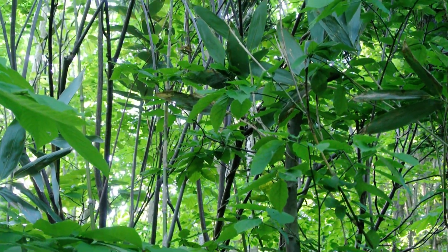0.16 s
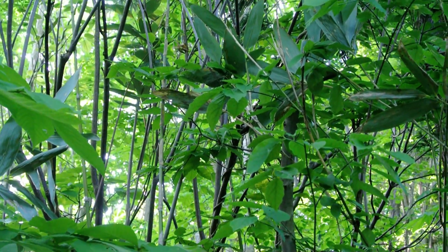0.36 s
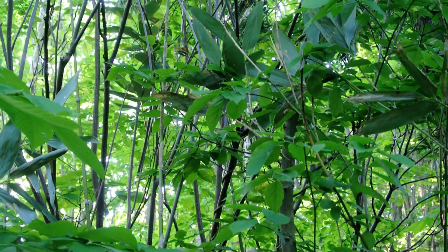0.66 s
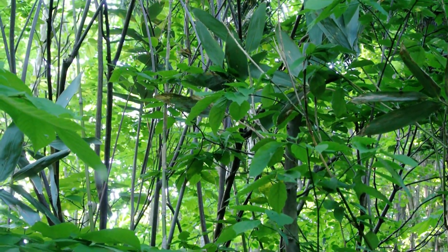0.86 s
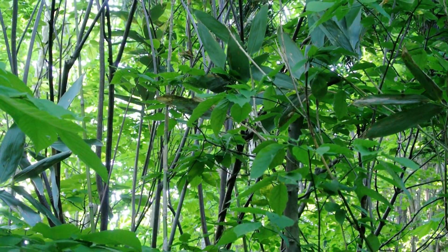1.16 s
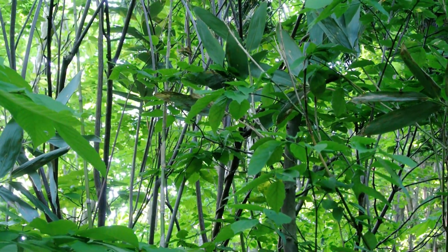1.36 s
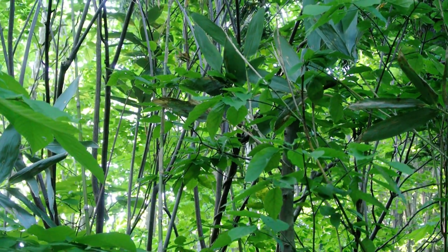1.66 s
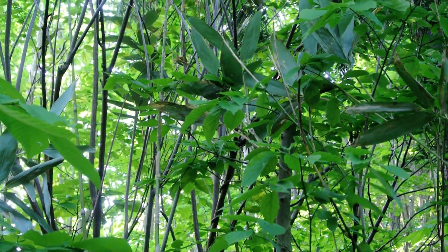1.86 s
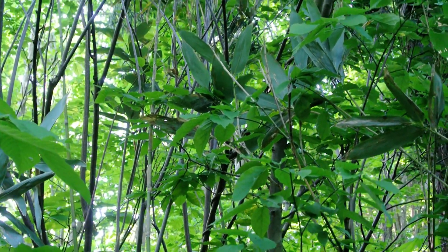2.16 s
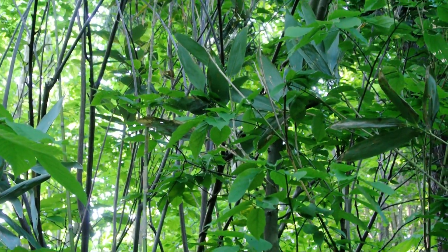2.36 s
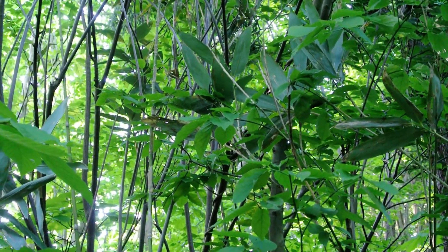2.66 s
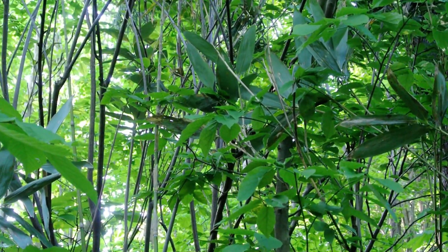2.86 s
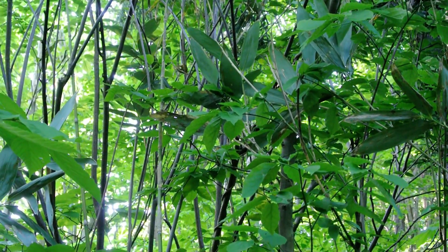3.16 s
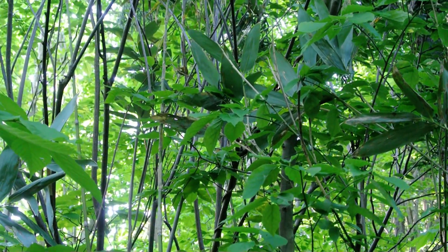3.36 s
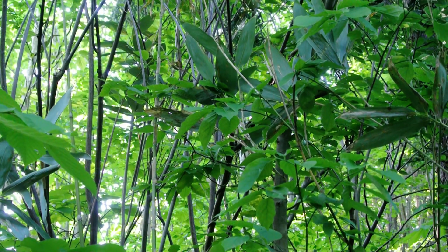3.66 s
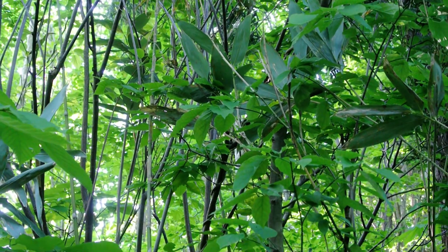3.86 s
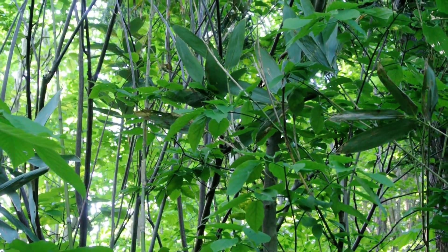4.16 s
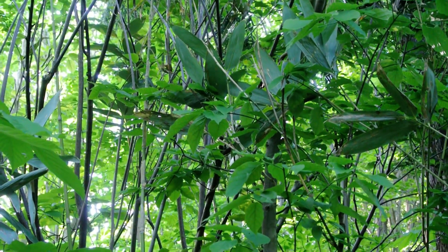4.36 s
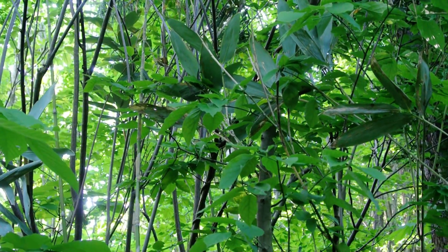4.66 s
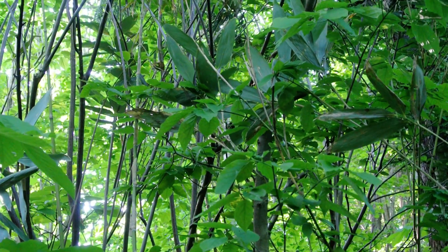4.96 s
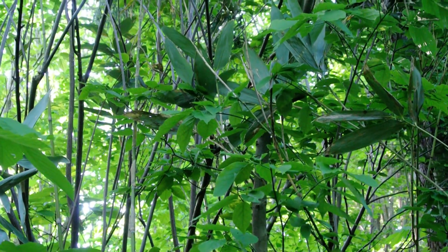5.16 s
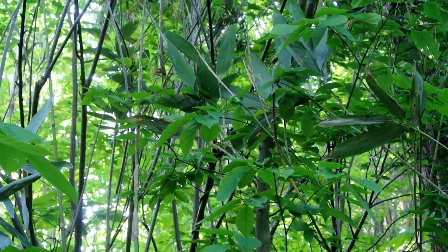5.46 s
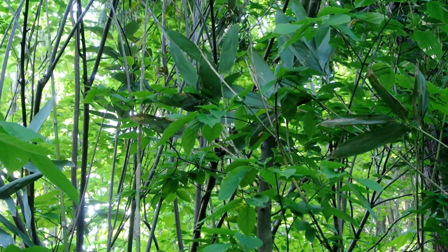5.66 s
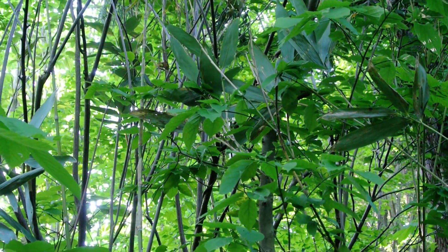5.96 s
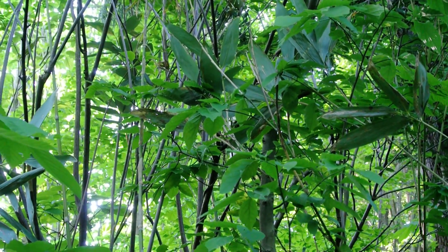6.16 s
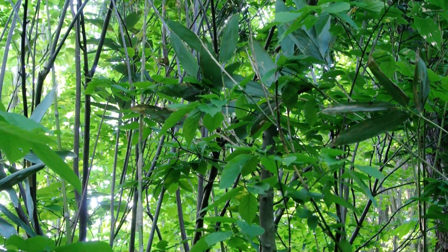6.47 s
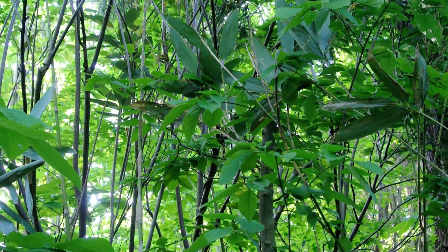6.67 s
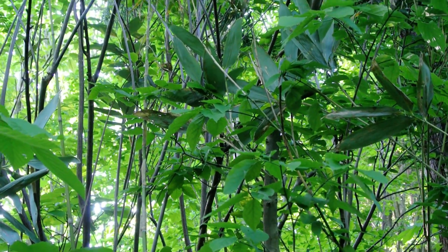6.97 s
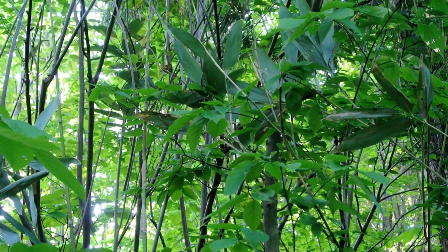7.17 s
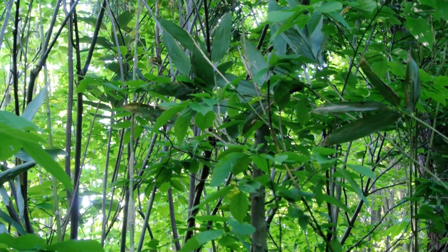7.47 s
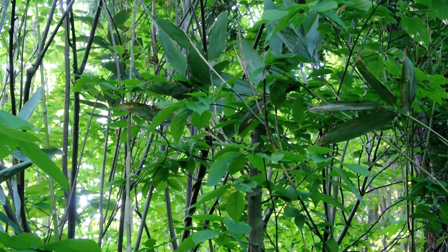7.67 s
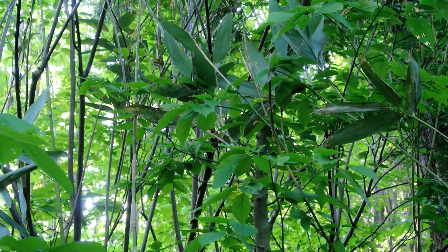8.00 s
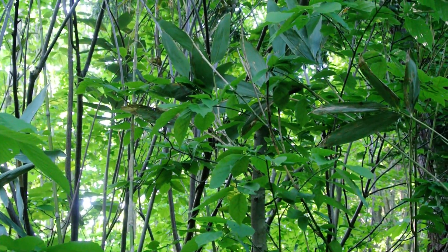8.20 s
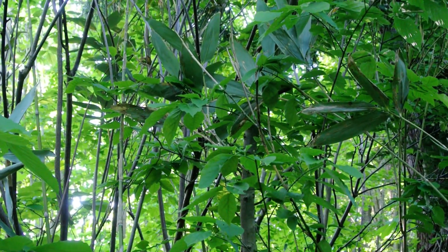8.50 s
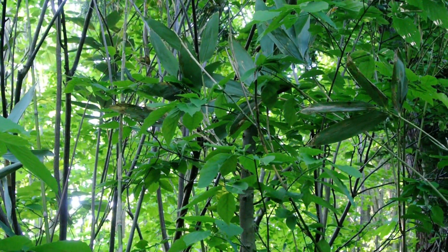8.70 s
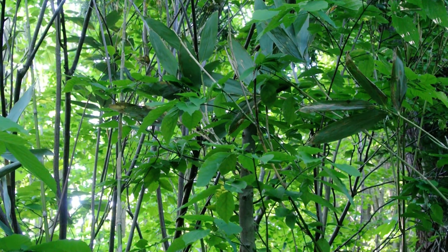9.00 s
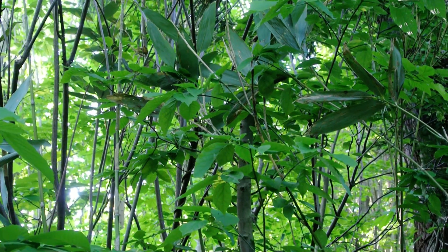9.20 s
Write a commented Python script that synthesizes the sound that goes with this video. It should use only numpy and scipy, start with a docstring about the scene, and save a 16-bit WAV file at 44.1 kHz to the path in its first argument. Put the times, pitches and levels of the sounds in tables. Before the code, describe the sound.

A group of jays trades short, hoarse, swelling screeches in dense woodland, some tens of metres away, nearly three each second. Softer voiced tones mix in. A songbird buzzes faintly around the middle, small whistles and hoarse chirps come near the end, and a dove coos very far off. The stereo microphone stands among leaves, with a short diffuse tail and a soft steady hiss.

```python
"""Jays screech one after another in a thicket, a few tens of metres off: a chaotic syrinx sounds through throat and beak.
Voiced tones, whistles, hoarse chirps and a far songbird's buzzes join in, and a dove coos far away: all wavering tones.
The ground and the thicket return every bird to the two microphone ports; a leaf rustles once as a puff of noise.
Behind lies a nearly steady woodland hush of shaped noise, with a thin whine at the top."""
import sys
import numpy as np
from scipy import signal
from scipy.fft import rfft, irfft, next_fast_len
from scipy.io import wavfile
from scipy.ndimage import uniform_filter1d, map_coordinates

SR = 44100
rng = np.random.default_rng(int(sys.argv[2]) if len(sys.argv) > 2 else 0)


def digitize_waveform(pressure):
    """Quantize a signal to 16-bit integers and store it at the path in sys.argv[1].

    Rows of a 2-D input are taken as channels; values are limited to [-1, 1].
    """
    field = np.atleast_2d(pressure).T
    bounded = np.clip(field, -1, 1)
    quanta = np.round(bounded * 32767).astype(np.int16)
    wavfile.write(sys.argv[1], SR, quanta)


N = 411894  # length [samples]

# Jay calls: (crest [s], rise [s], hold [s], fall [s], nominal level [dB],
# throat at start [Hz], throat at end [Hz], throat re level [dB], beak at start [Hz], beak at end [Hz],
# gape re level, before a common trim [dB], rasp re level [dB], chest re usual [dB])
SCREECHES = [ (0.0, 0.049, 0.078, 0.22, -40, 2117, 2122, -3.5, 3550, 3580, -2, -16, -6),
             (.31, .23, 0.061, .22, -31, 1954, 2080, -6, 3930, 3600, -5.5, -7, 3),
             (0.779, .27, .04, 0.19, -35, 2162, 2152, -5, 3620, 3350, -15, -11.5, 3),
             (0.998, .13, 0.097, 0.045, -39, 2094, 2237, -7, 3820, 3880, -7, -17, 0.1),
             (1.39, 0.34, 0.053, .25, -31.5, 1960, 2000, -7, 3220, 3880, -8, -9.5, 4),
             (1.7, .2, 0.079, .25, -37, 2364, 2214, -4.5, 3560, 3530, -9, -18, -3),
             (1.998, 0.21, 0.11, .15, -36.5, 2000, 1950, -7, 3650, 3520, -8, -12.5, 5),
             (2.18, .17, 0.043, .15, -35.5, 1997, 2080, -4, 3530, 3430, -5.5, -7.5, 4),
             (2.59, 0.31, 0.078, .25, -37.5, 2343, 2090, -9.5, 3400, 4170, -5, -17, 7),
             (2.843, .22, 0.091, 0.11, -35.5, 2115, 2182, -8, 3750, 3760, -7, -11.5, -3),
             (3.211, .26, 0.17, .11, -36.5, 2008, 2054, -5, 3560, 3720, -4, -8.5, 4),
             (3.89, .19, 0.21, 0.095, -31.5, 2026, 2012, -5, 3500, 3360, -7.5, -9, -8),
             (4.228, 0.067, .08, 0.098, -40, 2070, 2015, -9, 3860, 3800, -6, -24, 9),
             (4.419, .27, .14, .08, -35, 2075, 1983, -4.5, 3560, 3680, -8.5, -9, -1),
             (4.721, 0.11, .1, 0.066, -43, 2180, 2273, -5.5, 3200, 3500, -7, -14, -6),
             (5.08, .27, 0.062, 0.21, -46, 2274, 2337, -1.5, 3550, 3570, -1.5, -9, -2),
             (5.478, 0.058, 0.14, 0.16, -42, 2080, 1977, -2.5, 3720, 3330, -13, -14.5, 0.1),
             (5.83, .33, 0.042, 0.091, -38.5, 1998, 2122, -3.5, 3600, 3560, -4, -5, 4),
             (6.114, 0.054, .14, .12, -44.5, 2270, 2127, -3.5, 3260, 3260, -15, -22, -2.5),
             (6.4, 0.23, .12, .08, -37.5, 2276, 2195, -7, 3540, 3800, -10, -11, 0.1),
             (6.79, 0.29, .17, 0.13, -38, 2190, 2076, -4, 3750, 3500, -3.5, -10.5, 0),
             (7.099, .17, 0.059, .16, -29, 1880, 1990, -7.5, 3950, 3980, -11, -5.5, -15),
             (7.27, .12, 0.039, .13, -35.5, 2105, 2200, -5.5, 3670, 3750, -6, -5, -4),
             (7.658, 0.25, .02, .15, -46.5, 2190, 2153, 0.5, 3230, 3280, -9, -13, -1),
             (7.89, .12, .17, .12, -37.5, 1764, 2052, -4, 3300, 3660, -9, -8, 0),
             (8.74, 0.45, .05, .28, -37, 2038, 2068, -3, 3500, 3370, -7, -10.5, 3),
             (9.051, 0.33, 0.15, 0.16, -39.5, 2058, 2207, -5.5, 3520, 3640, -9, -14.5, 1),
             (9.34, .1, .01, 0.023, -34, 1840, 1847, -5.5, 3650, 3600, -12, -9, -4), ]
# Treble shape of the screech: (frequency [Hz], relative level [dB])
RASP_SHAPE = [(3060, -25), (5200, -3), (7870, -2), (8920, -13), (9700, -8.5), (11500, -19.5), (12600, -49),
              (15100, -70), (15800, -39)]
# Phase scatter of the jays between the two ports: (frequency [Hz], rms difference [rad])
PORT_PHASE = [(500, 0.11), (2000, 0.11), (5000, 1.15), (10000, 3)]
# How far below its crest a screech starts and ends [dB]; bend of its swell and sinking, 1 = straight in dB
DEPTH_DB, RISE_CURVE, FALL_CURVE = 21.5, 1.55, 1.84
JAY_LEAN_DB = -3  # left minus right

# The next five: (start [s], length [s], first [Hz], middle [Hz], last [Hz], nominal level [dB])
# Voiced tones, mostly below the whistles
VOICED_TONES = [(.22, 0.31, 674, 778, 773, -60), (.22, 0.12, 1960, 1960, 1990, -42),
                (.23, .1, 1310, 1363, 1397, -49), (1.32, 0.043, 2000, 1998, 1990, -39),
                (1.43, 0.078, 1975, 1970, 1996, -41.5), (1.92, .18, 1150, 1160, 1210, -58),
                (2.12, 0.035, 2010, 2036, 1950, -37), (2.32, 0.16, 1125, 1160, 1146, -56),
                (2.83, 0.24, 790, 835, 870, -61), (3.92, 0.16, 2100, 1973, 1864, -41),
                (4.94, .12, 2260, 2290, 2290, -49.5), (5.62, .12, 1266, 1234, 1240, -61),
                (6.05, .1, 1340, 1390, 1380, -62), (6.3, 0.17, 2206, 2295, 2335, -47),
                (7.03, .25, 740, 890, 620, -54), (7.08, 0.24, 1200, 1085, 1270, -53),
                (8.26, 0.27, 1170, 1180, 1185, -58)]
# Whistles of small birds
WHISTLES = [(3.635, .14, 4400, 4240, 4200, -51.5), (3.48, .2, 2900, 2930, 2900, -64),
            (8.21, .25, 3620, 3550, 3520, -47)]
# Hoarser chirps
CHIRPS = [(8.18, 0.099, 4250, 4300, 4320, -44.5), (8.425, 0.1177, 4200, 4295, 4300, -39.5)]
# Buzzy notes of a far songbird; the last row is a lower whistle near 2.9 kHz, given the same fast waver
BUZZES = [(4.75, 0.19, 5100, 5530, 5180, -55), (4.95, 0.22, 4960, 4800, 4340, -54),
          (5.24, .08, 3900, 4070, 4300, -51.5), (5.33, 0.12, 4560, 4480, 4200, -53),
          (5.33, 0.116, 5200, 5510, 5400, -56.5), (8.14, .36, 2950, 2870, 2900, -52.5)]
# Coos of a far dove
COOS = [(.45, 0.16, 472, 460, 480, -69), (.88, 0.43, 453, 455, 477, -72.5), (1.95, .6, 465, 470, 457, -63),
        (5.35, 0.38, 468, 483, 466, -66.5), (8.24, 0.45, 475, 463, 462, -62)]

# Decay time of the thicket's tail: (frequency [Hz], t60 [s])
THICKET_DECAY = [(500, 0.15), (3000, 0.53), (10000, 0.45)]
# Scattered against direct sound: (frequency [Hz], level [dB])
SCATTER = [(800, -3.5), (2000, -4.5), (4000, -1), (9000, -4)]
# A leaf is brushed: (start [s], length [s], level before colouring [dB])
LEAF = (1.168, 0.024, -43)

# Colour of the hush: (frequency [Hz], relative level [dB])
HUSH_SHAPE = [(12, -49), (20, -14.5), (357, -7), (1330, -5), (1480, -10), (2080, -3.5), (2530, -7),
              (2910, 4.5), (3530, -10.5), (4300, -5), (6010, -11.5), (13900, -15), (16000, -19)]
# Likeness of the hush at the two ports: (frequency [Hz], left-right correlation [-1 to 1])
HUSH_LIKENESS = [(30, 0.68), (100, 0.21), (400, 0.26), (2000, 0.49), (8000, 0)]
# Balance of the hush: (frequency [Hz], left minus right [dB])
HUSH_LEAN = [(30, -4), (150, 1), (700, -0.7), (12000, -0.1)]
# A thin steady tone: (frequency [Hz], level [dB])
WHINE = (15734, -85)
HUSH_DB = -47  # nominal rms level
TOP_HZ = 15790  # band limit of the recorder


def jays():
    """Each screech: the syrinx runs at half the throat resonance; throat, beak, gape and rasp colour it by frames."""
    out = np.zeros((2, N))
    frames = dict(fs=SR, nperseg=512, noverlap=384)
    for *shape, throat_from, throat_to, throat_db, beak_from, beak_to, gape_db, rasp_db, chest_db in SCREECHES:
        start, edge, progress, db = screech(*shape)
        throat_hz = throat_from + (throat_to - throat_from) * progress
        beak_hz = beak_from + (beak_to - beak_from) * progress
        source = syrinx(throat_hz / 2, jitter=.22, breathy=.68)
        hz, _, z = signal.stft(source, **frames)
        hz = hz[:, None]
        at = np.minimum(np.arange(z.shape[1]) * 128, len(db) - 1)  # sample at each frame

        # power responses, each brought to its own level below
        chest = 0.26 * peak(hz, 1824, 1350) ** 6 + 0.068 * peak(hz, 790, 310) ** 4
        throat = peak(hz, throat_hz[at], 500) ** 2 + amp(2 * chest_db) * chest
        beak = peak(hz, beak_hz[at], 850) ** 3 + 0.092 * peak(hz, 2930, 2800) ** 6  # narrow crest on a broad hump
        gape = peak(hz, 4670, 830) ** 4  # the open bill lifts an upper resonance
        rasp = amp(2 * along([(1200, -70), *RASP_SHAPE], hz))
        effort = amp(2 * (db + rasp_db + 41)[at])
        rasp = rasp * (1 + (hz / 12000) ** 4 * effort)  # more effort, brighter top
        parts = [(beak, db), (throat, db + throat_db), (gape, db + gape_db - 3.5), (rasp, db + rasp_db)]
        power = sum(part / part.mean(0) * amp(2 * level[at]) for part, level in parts)

        chaos = amp(1.78 * patches(z.shape))  # the level flickers in patches of pitch and time
        phase = along(PORT_PHASE, hz) * patches(z.shape)
        turn = np.exp(.5j * np.multiply.outer([1, -1], phase))
        voice = signal.istft(z * np.sqrt(power) * chaos * turn, **frames)[1][:, :len(db)]
        # the two halves of the syrinx beat
        beat_hz = 225 + 30 * wobble(len(db), 40.13)
        beat = np.cos(2 * np.pi * np.cumsum(beat_hz) / SR)
        lean = amp([[JAY_LEAN_DB / 2], [-JAY_LEAN_DB / 2]])
        add(out, start, voice * (1 + 0.069 * beat) * amp(-1.5) * edge * lean)
    return out


def syrinx(pitch_hz, jitter, breathy):
    """Membrane slaps at an unsteady pitch and size, mixed with turbulent air by its share of the power."""
    n = len(pitch_hz)
    unsteady = 1 + jitter * wobble(n, 300) + .03 * wobble(n, 25)
    cycles = np.cumsum(pitch_hz * unsteady) / SR
    slaps = np.diff(np.floor(cycles), prepend=0) * amp(1.95 * rng.standard_normal(n))
    share = np.clip(breathy, 0, 1)
    return np.sqrt(1 - share) * unit(slaps - slaps.mean()) + np.sqrt(share) * rng.standard_normal(n)


def screech(crest, rise, hold, fall, level_db):
    """First sample, fade, progress (about 0-1) and level in dB of one call: swell, hold, sink."""
    rise, hold, fall = np.abs([rise, hold, fall]) + .001
    start, t, edge = span(crest - rise, rise + hold + fall, fade=.012)
    swell = np.clip(1 - t / rise, 0, 2) ** RISE_CURVE
    sink = np.clip((t - rise - hold) / fall, 0, 2) ** FALL_CURVE
    return start, edge, t / t[-1], level_db - DEPTH_DB * (swell + sink)


def peak(hz, centre_hz, width_hz):
    """Magnitude of one resonance, 1 at its centre."""
    return np.abs(hz * width_hz / (centre_hz ** 2 - hz ** 2 + 1j * hz * width_hz))


def patches(shape):
    """A random field at rms 1, smooth over about 170 Hz and 60 ms of the jays' frames."""
    over_pitch = uniform_filter1d(rng.standard_normal(shape), size=2, axis=0)
    return unit(uniform_filter1d(over_pitch, size=22, axis=1))


def notes(rows, waver, waver_rate, warble_db, edge_db, pan_db):
    """Tones arch through three pitches, softer by edge_db at their ends; a fast, deep waver makes them buzz."""
    out = np.zeros((2, N))
    for s, length, first_hz, middle_hz, last_hz, db in rows:
        start, t, edge = span(s, length, fade=.012)
        u = 2 * t / length - 1  # -1 at the start, 1 at the end
        slope, bend = (last_hz - first_hz) / 2, (first_hz + last_hz) / 2 - middle_hz
        hz = middle_hz + slope * u + bend * u ** 2
        phase = 2 * np.pi * np.cumsum(hz * (1 + waver * wobble(len(hz), waver_rate))) / SR
        level = amp(db - edge_db * u ** 2 + warble_db * wobble(len(hz), 62.5))
        pan = amp([[pan_db / 2], [-pan_db / 2]])  # left minus right
        add(out, start, np.sqrt(2) * np.sin(phase) * edge * level * pan)
    return out


def ground(x):
    """The forest floor returns a dull copy 0.6 ms late, which thins the sound near 0.8 kHz."""
    return filtered(x, lambda hz: 1 + 0.24 * np.exp(-2j * np.pi * hz * 0.0006) / (1 + (hz / 1400) ** 4))


def thicket(x):
    """Trunks and leaves return a short tail, different at each port and new every third of a second."""
    out, step = np.zeros((2, N)), SR // 3
    for start in range(0, N, step):
        hz, t, z = signal.stft(rng.standard_normal((2, SR // 2)), SR, nperseg=256)
        t60 = along(THICKET_DECAY, hz)[:, None]
        decay = amp(along(SCATTER, hz)[:, None] - 60 * t / t60)
        even = np.sqrt(t60 * SR / 18.4)  # keeps a longer tail from being louder
        tail = signal.istft(z * decay / even, SR, nperseg=256)[1]
        add(out, start, signal.fftconvolve(x[:, start:start + step], tail, axes=1))
    return out


def rustle():
    """One short, bright puff from a leaf: noise under a half-sine swell, coloured around 9 kHz."""
    s, length, db = LEAF
    t = np.arange(N) / SR - s
    puff = rng.standard_normal((2, N)) * (t > 0) * np.sin(np.pi * np.clip(t / length, 0, 1))
    return amp(db) * filtered(puff, lambda hz: peak(hz, 9000, 9000))


def hush():
    """Far leaves, insects and microphone hiss as one shaped noise, with a thin whine at the top."""
    def mid_side(hz):
        turn = np.arccos(np.clip(along(HUSH_LIKENESS, hz), -1, 1)) / 2
        return amp(along(HUSH_SHAPE, hz)) * [np.cos(turn), np.sin(turn)]

    mid, side = filtered(rng.standard_normal((2, N)), mid_side)
    air = unit(np.array([mid + side, mid - side])) * amp(HUSH_DB + 0.69 * wobble(N, 2.95))
    air = filtered(air, lambda hz: amp(np.outer([.5, -.5], along(HUSH_LEAN, hz))))
    whine_hz, whine_db = WHINE
    return air + np.sqrt(2) * amp(whine_db) * np.sin(2 * np.pi * whine_hz * np.arange(N) / SR)


def amp(db):
    """Gain of a level in dB."""
    return 10 ** (np.asarray(db) / 20)


def unit(x):
    """x at rms 1."""
    return x / np.sqrt(np.mean(x ** 2) + 1e-20)


def along(points, hz):
    """Values between (Hz, value) points on a log frequency axis."""
    f, v = np.transpose(points)
    return np.interp(np.log(hz + 1), np.log(f + 1), v)


def wobble(n, rate):
    """A smooth random curve of n samples, rate knots a second."""
    return map_coordinates(rng.standard_normal(int(n * rate / SR) + 4), [np.arange(n) * rate / SR])


def filtered(x, response):
    """x times a response of frequency, padded so that nothing wraps round."""
    m = next_fast_len(N + SR // 2)
    return irfft(rfft(x, m) * response(np.fft.rfftfreq(m, 1 / SR)), m)[..., :N]


def span(start, length, fade):
    """First sample, seconds since the start, and a fade at both ends."""
    t = np.arange(round((length + 2 * fade) * SR)) / SR - fade
    edge = np.clip(np.minimum(t - t[0], t[-1] - t) / (2 * fade), 0, 1)
    return round((start - fade) * SR), t, np.sin(edge * np.pi / 2)


def add(track, start, x):
    """Mix x into the track at a sample, cut to the track's ends."""
    x = x[..., max(-start, 0):N - start]
    track[..., max(start, 0):max(start, 0) + x.shape[-1]] += x


def scene():
    """Birds over the ground, their scatter in the thicket, one leaf and the hush."""
    birds = jays()
    birds += notes(VOICED_TONES, waver=0.0202, waver_rate=59.3, warble_db=2.5, edge_db=3.5, pan_db=-4.5)
    birds += notes(WHISTLES, waver=0.0097, waver_rate=150, warble_db=3.5, edge_db=5, pan_db=1.2)
    birds += notes(CHIRPS, waver=0.018, waver_rate=300, warble_db=1.5, edge_db=3, pan_db=0.0)
    birds += notes(BUZZES, waver=0.0437, waver_rate=500, warble_db=3, edge_db=2, pan_db=0.0)
    birds += notes(COOS, waver=0.07, waver_rate=60, warble_db=2.5, edge_db=6, pan_db=-1.0)
    birds = ground(birds)
    return birds + thicket(birds) + rustle() + hush()


def record(dry):
    """The recorder keeps nothing above its band limit."""
    return filtered(dry, lambda hz: hz < TOP_HZ)


dry = scene()
out = record(dry)
digitize_waveform(out)
```